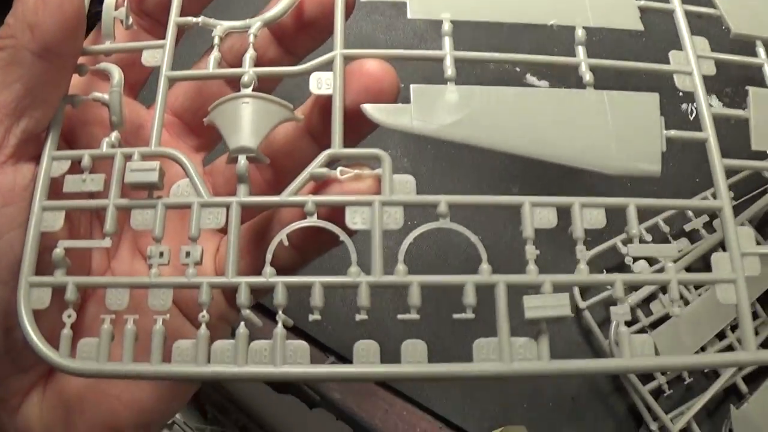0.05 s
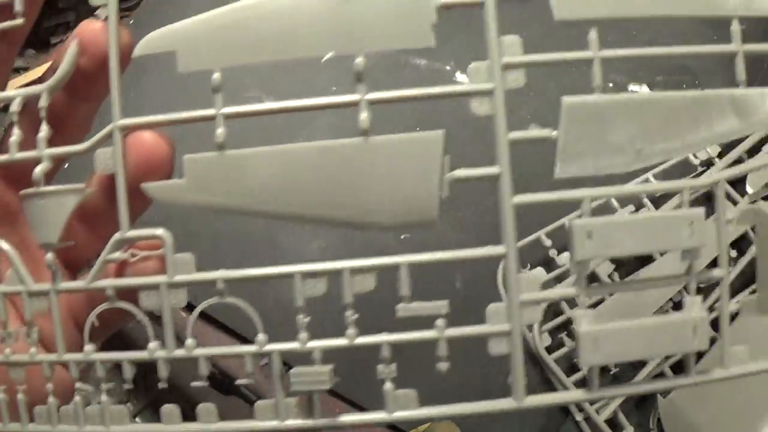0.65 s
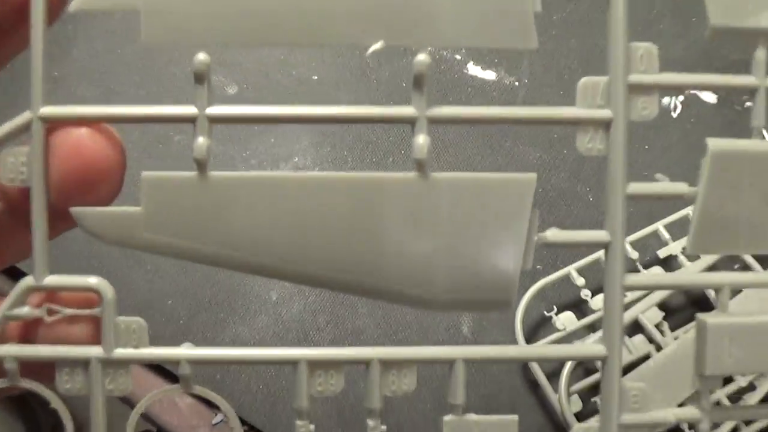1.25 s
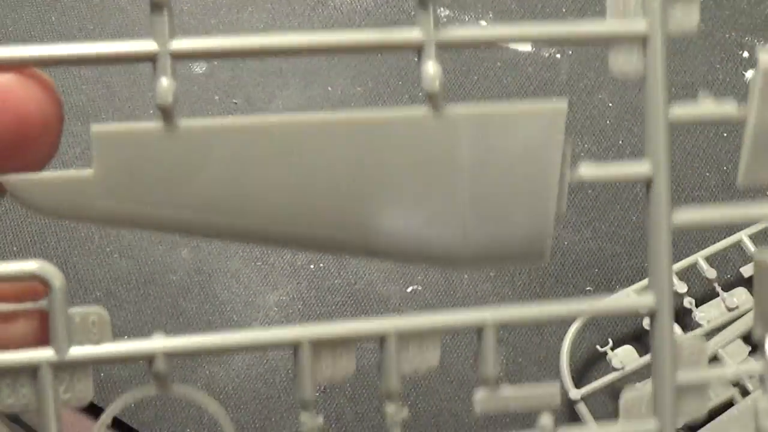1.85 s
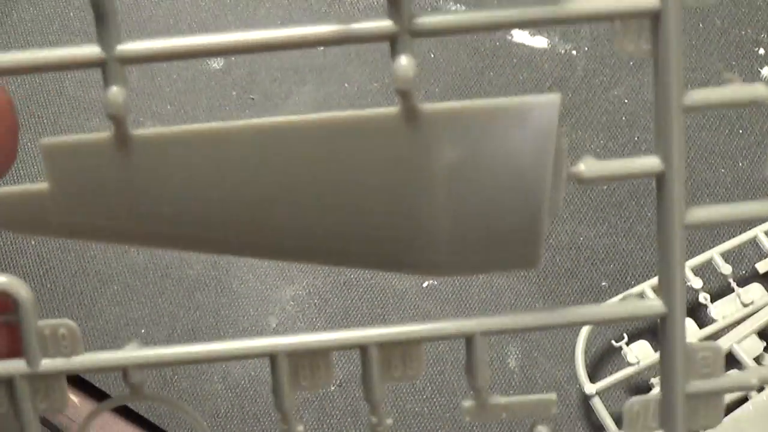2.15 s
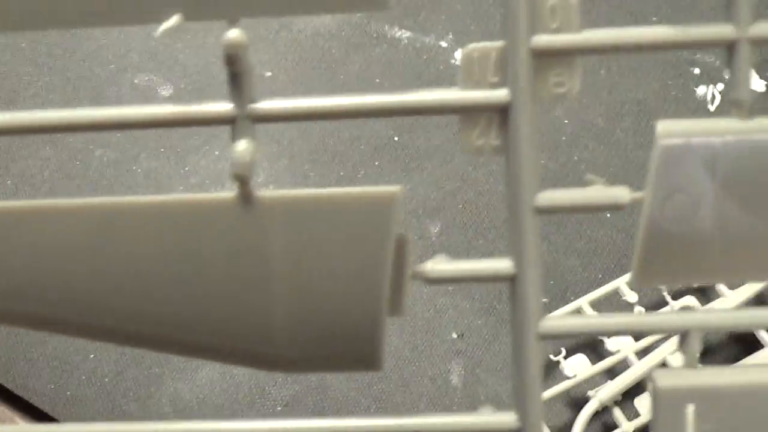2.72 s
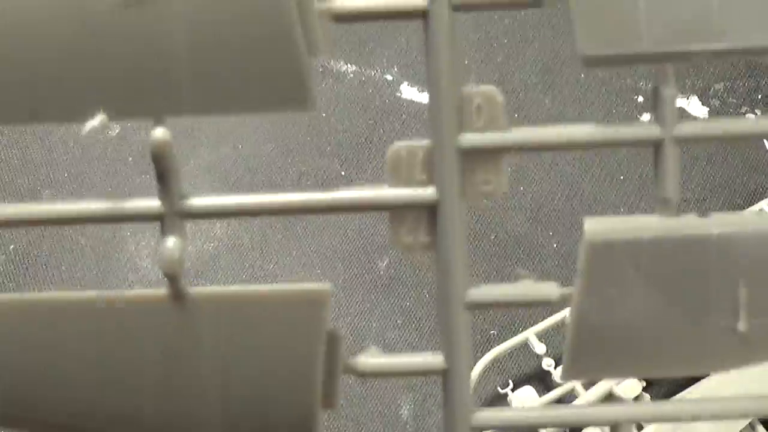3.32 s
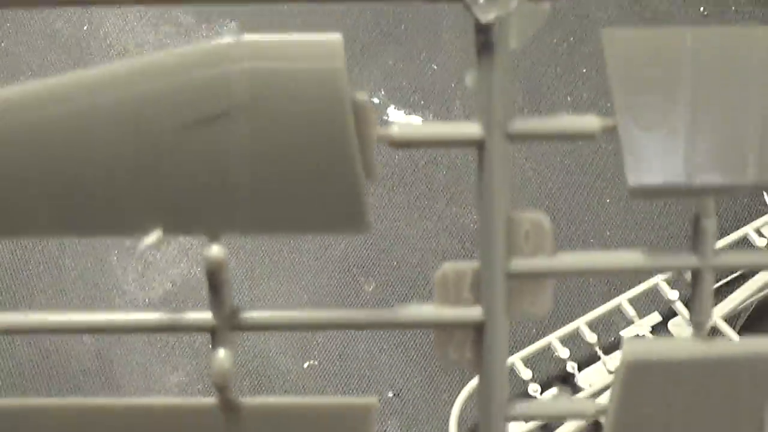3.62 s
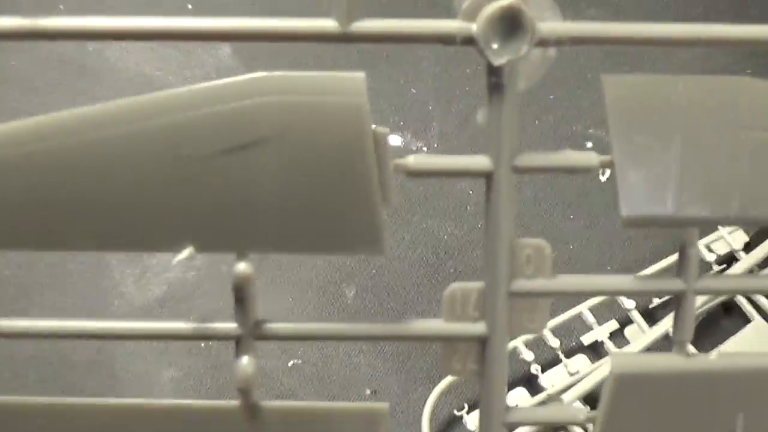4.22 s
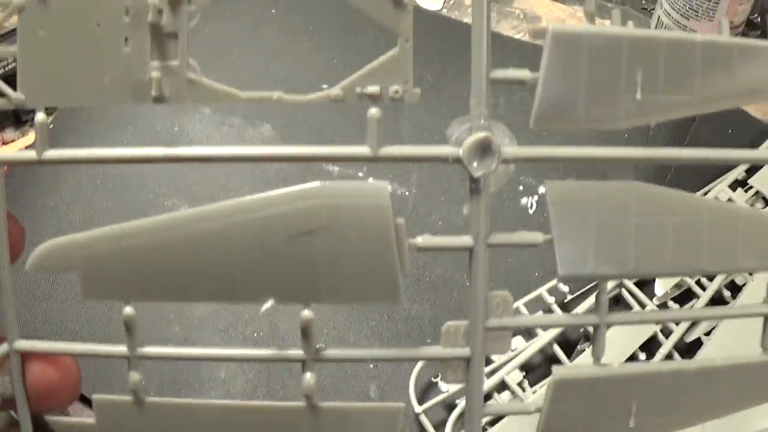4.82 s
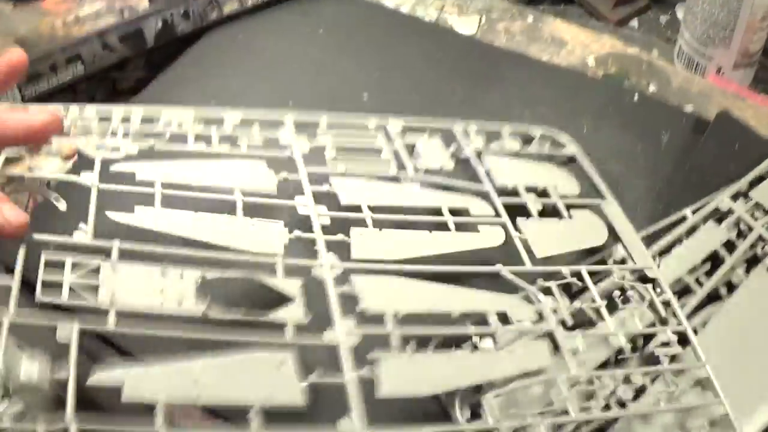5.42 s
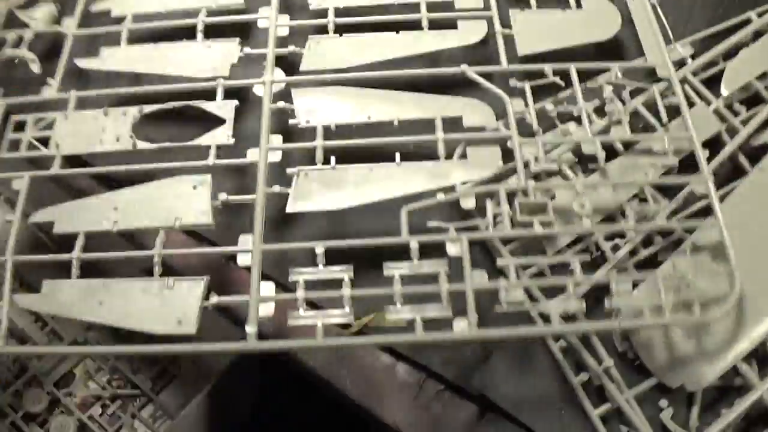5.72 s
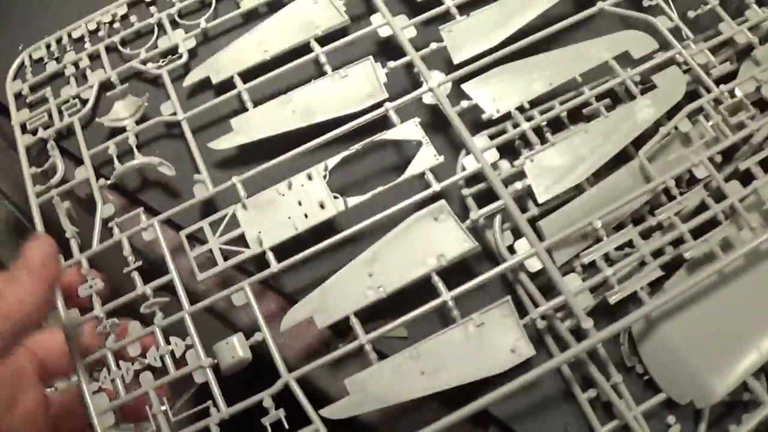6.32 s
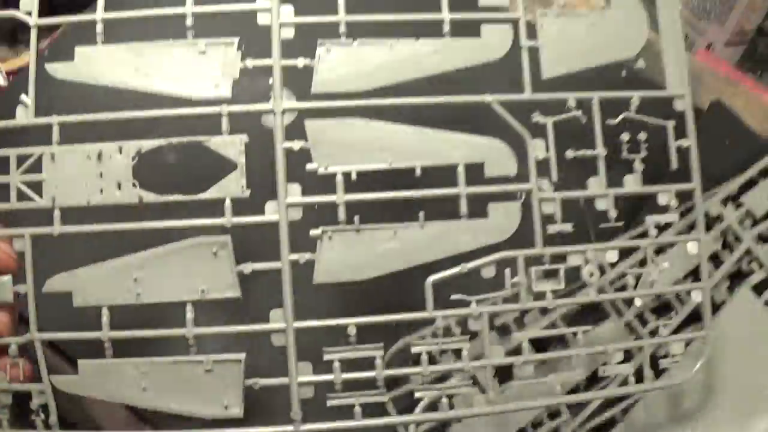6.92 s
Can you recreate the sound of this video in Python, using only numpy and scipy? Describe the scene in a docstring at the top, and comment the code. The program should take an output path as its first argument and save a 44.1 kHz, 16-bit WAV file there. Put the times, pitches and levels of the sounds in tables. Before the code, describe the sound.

A hard plastic model-kit sprue is handled close to the microphone in a quiet small room. A short cluster of dry ticks comes at about 1 second and one sharp click at 1.5 seconds. After a lull, a creaky run of small clicks comes at 4 seconds, with faint ticks just before 5. The sprue then slides off the fingers with a soft hiss. From 5.4 to 6.3 seconds it clatters onto a pile of other sprues, slightly farther away and a little to the right: quick, bright knocks, rattling small parts, brief scrapes and soft bench thuds. This is the loudest part. It settles, and lighter clicks around 6.6 and 7 seconds follow as it is picked up, over a faint rumble of arm movement. A faint, high pulsing whine like a camera's focus motor comes and goes throughout, and a faint low hum swells near 1.4 and 4.5 seconds.

```python
"""A plastic model-kit sprue ticks and creaks in one hand, slides off the fingers, clatters onto a pile of
other sprues on a bench, settles and is picked up again. Each contact is an impulse that gives a sharp
crack and excites the damped modes of the frames. Loose parts rattle, the bench thuds and sliding
friction hisses. Behind these are a rumble of moving arms, a faint pulsing whine like that of a
camera's focus motor, a low hum that comes and goes, and a quiet room."""
import sys
import numpy as np
from scipy import signal
from scipy.fft import rfft, irfft, next_fast_len
from scipy.io import wavfile
from scipy.ndimage import uniform_filter1d

SR = 44100
rng = np.random.default_rng(int(sys.argv[2]) if len(sys.argv) > 2 else 0)


def int16_out(signal):
    """Quantize to a 16-bit WAV file."""
    q = np.round(np.clip(np.atleast_2d(signal).T, -1, 1) * 32767)
    wavfile.write(sys.argv[1], SR, q.astype(np.int16))


N = 315756
TIME, RING_TIME = np.arange(N) / SR, np.arange(SR // 5) / SR
LEFT_RIGHT = np.array([[1], [-1]])

# Ticks in the hand. Each row: start in seconds, level in dB, most strongly excited frequency in Hz,
# fall to either side in dB per octave.
TICKS = [(0.278, -50, 12500, 4), (0.461, -51, 550, 2), (0.94, -30.5, 3900, 6), (0.946, -44, 910, 6),
         (0.971, -45.5, 1500, 8.5), (0.98, -35.5, 1830, 15.5), (1.5187, -18.5, 2100, 7.5),
         (1.623, -47, 2730, 9), (1.86, -54, 11000, 7), (2.065, -60.5, 2600, 3), (3.97, -52, 1700, 9),
         (3.995, -37, 5530, 6.5), (4.01, -43.5, 1520, 9), (4.039, -40, 1750, 7.5), (4.045, -40.5, 1050, 12),
         (4.091, -45.5, 1760, 8), (4.11, -38, 2220, 11.5), (4.724, -53, 2760, 5), (4.804, -55, 1100, 9),
         (4.933, -57, 6050, 3), (4.961, -44, 1600, 9), (6.968, -41.5, 400, 10.5), (7.076, -50.5, 560, 3.5)]
# Strong modes of the held frame. Each row: frequency in Hz, relative level in dB, t60 in seconds.
HELD_MODES = [(420, 26.5, 0.097), (699, 22.5, 0.083), (1108, 8, 0.048), (1320, 6.5, 0.053),
              (1950, 6.5, 0.26), (2110, 15.5, 0.07), (2820, 9, 0.02), (3980, 17, 0.023),
              (4500, 14.5, 0.044), (5540, 23, 0.0071), (9070, 17.5, 0.017)]
# How readily the held frame rings. Each entry: gain of one band in dB.
TICK_RING_DB = [2, -1, -1.1, -5, -0.6]

def held_sprue(crack_hz=2900, crack_gain_db=6.5, finger_t60=.11):
    """Damped free vibration: the flexing frame ticks, the fingers damp it, thin rods radiate no bass."""
    modes = sprue_modes(HELD_MODES, parts_t60=0.031, slope=0.5, count=240)
    start, db, pitch, fall = columns(TICKS)
    centres = np.sqrt(np.multiply(BAND_EDGES_HZ[:-1], BAND_EDGES_HZ[1:]))
    band_db = db - fall * np.abs(np.log2(centres / pitch)) + TICK_RING_DB
    crack_db = db - fall * np.abs(np.log2(crack_hz / pitch)) + crack_gain_db
    ticks = strike(start, modes, band_db, crack_db, finger_t60, pan_db=0,
                   crack_band_hz=(1500, 5110), spot_db=-5.0, spread=0.47)
    return band(ticks, 470, 21000, order=3)

# Knocks of sprue on sprue. Each row: start in seconds, level in dB, weight (bass emphasis),
# hardness (treble emphasis), damping t60 in seconds.
KNOCKS = [(5.4369, -22.5, 12.5, -6.5, 0.038), (5.4628, -21, 5, 8.5, 0.19), (5.4826, -21.5, 1, -5.5, 0.44),
          (5.5196, -22, 0, -9, 0.66), (5.5847, -23, 1, 7.5, 0.2), (5.6409, -22.5, 0, -11, .065),
          (5.653, -17.5, -4.5, 1.5, 0.2), (5.6815, -24, 3.5, 0, 0.17), (5.697, -18.5, -8, -2.5, 0.11),
          (5.7349, -32.5, -11, -7, 0.11), (5.7864, -19, 8, -4.5, .072), (5.7948, -32.5, 2, 18.5, 0.081),
          (5.811, -27, -5, -6, .14), (5.8737, -33.5, -10, 8.5, 0.26), (5.8964, -26.5, 4, 9, .26),
          (5.9085, -37, 26.5, -2, 0.16), (5.9348, -28.5, -1, 5.5, 0.14), (5.9467, -28, -5, 3, 0.26),
          (5.9659, -18.5, -5, -6, 0.035), (5.9808, -23.5, 2, -12, 0.26), (6.0089, -28.5, 11, -16, 0.14),
          (6.0361, -32.5, 3, 1, 0.36), (6.0637, -24, 1, -0.5, 0.13), (6.0825, -14, -5, -11.5, 0.042),
          (6.0939, -29, -2, 8, .13), (6.1009, -24.5, -3, -6.5, 0.43), (6.1359, -32.5, 6, 15.5, 0.11),
          (6.1579, -28, -2, -2, 0.21), (6.1767, -27, -6, -1.5, 0.071), (6.1998, -29, 0, 7, 0.14),
          (6.2225, -33.5, -1, 1, 0.45), (6.2529, -38, 3, -2, .1), (6.3029, -37, -9, 4, 0.2),
          (6.4912, -43.5, -2, 5.5, 0.32), (6.5435, -38, 0, -3, 0.064), (6.555, -37, -7, -2, 0.19),
          (6.5712, -23, -7.5, -6, 0.036), (6.596, -38, -23, -18, 0.12), (6.7212, -46, 19.5, 22.5, 0.052)]
# Strong modes of the pile. Each row: frequency in Hz, relative level in dB, t60 in seconds.
PILE_MODES = [(424, 1, 0.34), (948, 11, 0.26), (1426, 11, 0.19), (1595, 23.5, 0.047), (1703, 17.5, 0.24),
              (1907, 15.5, 0.39), (2750, 16.5, 0.13), (2770, 18.5, 0.34), (3020, 18, 0.032),
              (4560, 12, 0.15), (5180, 12, 0.13), (6360, 16, 0.046), (8300, 8, 0.11), (9500, -2, 0.044),
              (9900, 17, 0.041)]
# Ring of a plain knock. Each entry: gain of one band in dB.
KNOCK_RING_DB = [-30.5, -13, -7, -8.5, -9]

def pile(plain_t60=0.1):
    """Impact excitation: heavy knocks add bass; hard ones add treble and crack."""
    modes = sprue_modes(PILE_MODES, parts_t60=0.34, slope=0.81, count=440)
    start, db, weight, hardness, t60 = columns(KNOCKS)
    weight_db = weight * [0.98, 0.58, 0, 0.034, 0.17]   # band by band
    hardness_db = hardness * [0.14, 0.075, 0.015, 0.62, 0.85]
    band_db = db + KNOCK_RING_DB + weight_db + hardness_db
    firmness_db = 3 * np.log2(plain_t60 / t60)   # a firm contact rings less and cracks louder
    crack_db = db + 5.5 + 0.46 * hardness - 0.28 * weight + firmness_db
    pan_db = -3 + 0.18 * weight   # the pile lies to the right; heavy knocks land farther left
    return strike(start, modes, band_db, crack_db, t60, pan_db,
                  crack_band_hz=(2030, 5200), spot_db=3.5, spread=0.18)

# Radiation of the small parts. Each row: frequency in Hz, relative level in dB.
PART_SPECTRUM = [(200, -9), (800, -4.5), (1500, 3.5), (3200, 12), (5000, 5.5), (8000, 7.5), (10500, 2),
                 (12500, -3.5), (16000, -17.5)]

def sprue_modes(strong, parts_t60, slope, count):
    """Modal density: small parts add many weak modes to the strong ones, the higher dying sooner."""
    places = (np.arange(count) + rng.random(count)) / count
    hz = np.interp(places, [0, 1], np.sqrt([BAND_EDGES_HZ[0], BAND_EDGES_HZ[-1]])) ** 2
    t60 = parts_t60 * (hz / BAND_EDGES_HZ[2]) ** -slope
    weak = np.column_stack([hz, at_hz(PART_SPECTRUM, hz), t60])
    return np.vstack([strong, weak]).T

# The five bands that a contact excites. Each entry: band edge in Hz.
BAND_EDGES_HZ = [200, 800, 2000, 4500, 8500, 16000]

def strike(times, modes, band_db, crack_db, damping_t60, pan_db, crack_band_hz, spot_db, spread):
    """Modal superposition: each contact cracks and rings the modes according to the spot touched."""
    hz, mode_db, t60 = modes
    shape = (len(times), len(hz))
    # the spot along a rod favours evenly spaced groups of modes
    transit_s = rng.uniform(0.00021, 0.000866, (len(times), 1))
    place = rng.random((len(times), 1))
    favour_db = spot_db * np.sin(2 * np.pi * (hz * transit_s + place))
    radiated = rng.choice([-1, 1], shape) + spread * LEFT_RIGHT[:, None] * rng.standard_normal(shape)
    strengths = from_db(mode_db + favour_db) * radiated
    damping = fade(RING_TIME, np.maximum(damping_t60, .005))   # fingers and neighbours press on the frame
    build_up = 1 - fade(RING_TIME, 0.002)   # the blow takes a moment to spread through the rods
    ringing = 0
    for k, (low, high) in enumerate(zip(BAND_EDGES_HZ, BAND_EDGES_HZ[1:])):
        inside = (hz >= low) & (hz < high)
        ring = strengths[..., inside] @ rings(hz[inside], t60[inside]) * damping * build_up
        attack_rms = np.sqrt(np.mean(ring[..., :SR // 200] ** 2, axis=(0, 2)))
        ringing = ringing + ring * (from_db(band_db[:, k]) / attack_rms)[:, None]
    crack = band(signal.unit_impulse(len(RING_TIME)), *crack_band_hz, order=3)
    cracks = from_db(crack_db) * crack / np.abs(crack).max()
    contacts = (ringing + cracks) * from_db(LEFT_RIGHT[:, None] * pan_db / 2)
    out = np.zeros((2, N))
    for k, start in enumerate(times.ravel()):
        add(out, start, contacts[:, k])
    return out

# Spectrum of the loose parts. Each row: frequency in Hz, relative level in dB.
RATTLE_SPECTRUM = [(35, -61), (60, -16), (233, -3), (593, -14.5), (842, 0.5), (1060, -8.5), (1700, -0.5),
                   (1950, -6.5), (2770, 0), (4750, -8.5), (10300, -15.5), (11800, -23), (13900, -23),
                   (16000, -34)]

def rattle(per_s, size_db, part_t60, pan_db, spread, count=10):
    """Shot noise: loose parts make tiny random contacts, each part with a brief ring of its own."""
    sizes = from_db(size_db * np.minimum(rng.exponential(1, N), 3)) * rng.choice([-1, 1], N)
    clicks = sizes * (rng.random(N) < per_s / SR)
    part = rng.integers(0, count, N)
    mid, side = rng.standard_normal((2, count, len(RING_TIME))) * fade(RING_TIME, part_t60)
    swarm, level = np.zeros((2, N)), shaking()
    for i in np.flatnonzero(clicks * level):
        add(swarm, i / SR, clicks[i] * (mid[part[i]] + spread * LEFT_RIGHT * side[part[i]]))
    swarm = colour(swarm, RATTLE_SPECTRUM)
    power = uniform_filter1d(np.mean(swarm ** 2, axis=0), size=SR // 25)
    steady = swarm / np.sqrt(np.maximum(power, 1e-6))
    return steady * level * from_db(LEFT_RIGHT * pan_db / 2)

def shaking(rise_s=0.009):
    """Energy summation: each knock shakes the loose parts, which chatter briefly and settle slowly."""
    t = np.arange(SR) / SR
    chatter = from_db(-15.5) * fade(t, t60=0.17)
    settling = from_db(-30) * fade(t, t60=1.79)
    response = (chatter + settling) * (1 - np.exp(-t / rise_s))
    energy = np.zeros((1, N))
    for start, db, *_ in KNOCKS:
        add(energy, start, (from_db(db) * response) ** 2)
    return np.sqrt(energy[0])

# The bench takes the weight. Each row: start in seconds, level in dB.
THUDS = [(5.463, -44), (5.654, -68), (5.786, -33.5), (5.901, -45.5), (6.135, -41), (6.97, -48)]
# Modes of the bench top. Each row: frequency in Hz, relative level in dB, t60 in seconds.
BENCH_MODES = [(75, -11, 0.17), (124, -9.5, 0.25), (176, -7, 0.12), (244, -9, 0.14)]

def bench():
    """Plate resonance: the low modes of the bench top thud softly under the pile."""
    hz, db, t60 = np.transpose(BENCH_MODES)
    out, modes = np.zeros((2, N)), rings(hz, t60)
    for start, thud_db in THUDS:
        add(out, start, from_db(thud_db + db) * rng.choice([-1, 1], len(hz)) @ modes)
    return out

# Strokes over skin and plastic. Each row: time of full level in seconds, hold in seconds, level in dB.
STROKES = [(0.365, .12, -64.5), (5.015, 0.072, -53.5), (5.179, 0.06, -53.5), (5.286, 0.045, -61.5),
           (5.403, 0.3, -51), (5.831, 0.013, -39), (6.124, 0.042, -39), (6.508, .015, -49),
           (6.715, 0.053, -54), (6.885, 0.26, -67)]
# Resonances of the sliding rods. Each row: frequency in Hz, bandwidth in Hz, relative gain in dB.
SQUEAL = [(5040, 78, 1.5), (7700, 190, -16)]
# Colour of the friction. Each row: frequency in Hz, relative gain in dB.
SLIDE_SPECTRUM = [(41, -35), (70, -25), (129, 2), (170, -25), (244, -0.5), (1000, -4), (2600, -5),
                  (2840, -3.5), (4090, -7.5), (8860, -2), (11100, -4.5), (16000, -25)]

def slide(grain_db, spread, attack_s=0.033, release_t60=0.26):
    """Sliding friction: a hiss roughened by tiny catches sets the rods squealing faintly."""
    catches = band(rng.standard_normal(N), 9.9, 170, order=1)
    mid, side = rng.standard_normal((2, N)) * from_db(grain_db * catches / rms(catches))
    rub = mid + spread * LEFT_RIGHT * side
    squeal = sum(from_db(db) * band(rub, hz - width / 2, hz + width / 2, order=1)
                 for hz, width, db in SQUEAL)
    level = np.zeros(N)
    for full_s, hold_s, db in STROKES:
        swell = np.exp(np.minimum(TIME - full_s, 0) / attack_s)
        release = fade(np.maximum(TIME - full_s - hold_s, 0), release_t60)
        level += from_db(db) * swell * release
    return level * colour(rub + squeal, SLIDE_SPECTRUM)

# Hands and arms move over the bench. Each row: time in seconds, level in dB.
ARM_MOVEMENT = [(4.7, -79), (5.3, -70.5), (6.2, -57.5), (6.6, -66.5), (7.16, -67)]

def handling():
    """Band-limited noise: a dull rumble follows the movement of the arms."""
    rumble = band(rng.standard_normal(N), 40, 326)
    times, db = np.transpose(ARM_MOVEMENT)
    level = from_db(np.interp(TIME, times, db, left=-200, right=-200))
    return level * rumble / rms(rumble)

# Motor runs. Each row: start and end in seconds, pitch in Hz, first and last level in dB.
FOCUS_RUNS = [(0, .25, 2770, -65.5, -69), (.3, .56, 3280, -70, -71), (.6, .93, 3170, -68, -64.5),
              (1.63, 2.3, 3190, -63.5, -65), (2.33, 4, 3180, -65.5, -67.5),
              (4.73, 7.16, 2850, -63.5, -65.5)]

def focus_motor(burst_s, jitter, housing_hz, housing_db, rasp, steps_per_s=30, centre_s=.018):
    """Pulsed excitation: the motor moves in regular bursts, raspy pips that also stir its housing."""
    out = np.zeros((2, N))
    t = np.arange(SR // steps_per_s) / SR - centre_s
    swell = np.sqrt(2) * np.exp(-.5 * (t / burst_s) ** 2)
    for start, end, hz, first_db, last_db in FOCUS_RUNS:
        steps = np.arange(round(start * steps_per_s), round(end * steps_per_s))
        for step, db in zip(steps, np.linspace(first_db, last_db, len(steps))):
            pip_hz, ring_hz = np.array([hz, housing_hz]) * (1 + jitter * rng.standard_normal(2))
            pip = np.sin(2 * np.pi * (pip_hz * t + rng.random()))
            housing = from_db(housing_db) * np.sin(2 * np.pi * ring_hz * t)
            add(out, step / steps_per_s, from_db(db + rng.normal(0, 1)) * swell * (pip + housing))
    shake = band(rng.standard_normal(N), 100, 700, order=1)
    return out * (1 + rasp * shake / rms(shake))

# Swells of the hum. Each row: time of the peak in seconds, width in seconds, level in dB.
HUM_SWELLS = [(1.42, 0.084, -64), (4.5, 0.1, -67.5)]

def hum(hz=201):
    """Amplitude modulation: a soft low tone swells out of the background and sinks back."""
    swell = sum(from_db(db) * np.exp(-.5 * ((TIME - s) / width) ** 2) for s, width, db in HUM_SWELLS)
    return swell * np.sin(2 * np.pi * hz * TIME)

# Room noise and hiss. Each row: frequency in Hz, relative level in dB.
AIR_SPECTRUM = [(15, -31), (25, -14.5), (108, -0.5), (145, -7.5), (206, -3), (416, -6), (545, -7),
                (1190, -11.5), (2110, -13), (2690, -14.5), (3160, -16), (3430, -16.5), (3920, -18.5),
                (14800, -25.5), (16000, -21.5)]
# Likeness of the two sides. Each row: frequency in Hz, correlation from 0 to 1.
AIR_CORRELATION = [(60, 0.73), (180, 0.64), (550, 0.068), (1650, 0.056), (4970, 0.54), (15000, 1)]

def air(level_db=-61):
    """Partial coherence: room noise and microphone hiss are alike at both sides in bass and top."""
    alike = np.clip(at_hz(AIR_CORRELATION, np.fft.rfftfreq(N, 1 / SR)), 0, 1)
    mid, side = rfft(rng.standard_normal((2, N)))
    noise = irfft(np.sqrt(1 + alike) * mid + np.sqrt(1 - alike) * side * LEFT_RIGHT, N)
    return from_db(level_db) * colour(noise, AIR_SPECTRUM)

def room(x, t60, dull_hz):
    """Diffuse reverberation: a small workroom returns duller reflections, different at each side."""
    t = np.arange(SR // 2) / SR
    tail = band(rng.standard_normal((2, len(t))), 250, dull_hz, order=1) * fade(t, t60) * (t > .005)
    return signal.fftconvolve(x, tail / np.sqrt(np.sum(tail ** 2) / 2), axes=1)[:, :N]

def microphones(x, side_low_hz, presence):
    """Close spacing: two capsules hear the same bass; the right one has more upper midrange."""
    mid, side = (x[0] + x[1]) / 2, (x[0] - x[1]) / 2
    side = band(side, side_low_hz, 12400, order=1) - presence * band(mid, 2600, 2800, order=1)
    return mid + LEFT_RIGHT * side

def rings(hz, t60):
    """Damped oscillation: one decaying sine per mode."""
    return np.sin(2 * np.pi * hz[:, None] * RING_TIME) * fade(RING_TIME, t60[:, None])

def fade(t, t60):
    """Exponential decay, by 60 dB in t60 seconds."""
    return from_db(-60 * t / t60)

def band(x, low_hz, high_hz, order=2):
    """Causal band-pass filtering."""
    sections = signal.butter(order, [low_hz, min(high_hz, .45 * SR)], "band", fs=SR, output="sos")
    return signal.sosfilt(sections, x + 1e-18)

def colour(x, spectrum):
    """Minimum-phase filtering by the given spectrum, scaled to rms 1."""
    size = 2 * next_fast_len(N // 2 + SR // 4)
    gain = from_db(at_hz(spectrum, np.fft.rfftfreq(size, 1 / SR)))
    cepstrum = irfft(np.log(gain))
    cepstrum[1:size // 2] *= 2   # folding onto positive time makes the filter causal
    cepstrum[size // 2 + 1:] = 0
    out = irfft(rfft(x, size) * np.exp(rfft(cepstrum)))[..., :N]
    return out / rms(out)

def at_hz(points, hz):
    """Interpolation of a spectrum on a log-frequency axis."""
    point_hz, value = np.transpose(points)
    return np.interp(np.log(np.maximum(hz, 1)), np.log(point_hz), value)

def from_db(db):
    """Decibels to amplitude ratio."""
    return 10 ** (np.asarray(db) / 20)

def rms(x):
    """Root mean square over all samples."""
    return np.sqrt(np.mean(x ** 2) + 1e-20)

def columns(rows):
    """The columns of an event table, each of shape (events, 1)."""
    return np.transpose(rows)[..., None]

def add(out, start_s, sound):
    """Superposition of a short sound onto the mix."""
    start = max(round(start_s * SR), 0)
    out[:, start:start + sound.shape[-1]] += sound[..., :max(N - start, 0)]

def scene():
    """Direct-to-reverberant ratio: the held sprue is near and dry; the farther pile has more room."""
    near = held_sprue() + slide(grain_db=2.0, spread=0.28)
    far = pile() + bench()
    far += from_db(-2.0) * rattle(per_s=220, size_db=2.5, part_t60=0.045, pan_db=-1.5, spread=0.055)
    near_room = room(from_db(-22) * near, t60=0.15, dull_hz=710)
    far_room = room(from_db(-17.0) * far, t60=0.18, dull_hz=5100)
    motor = focus_motor(burst_s=0.0031, jitter=.005, housing_hz=2160, housing_db=-11.5, rasp=0.44)
    return near + far + near_room + far_room + motor + hum() + handling() + air()

def record(dry):
    """Band limiting: a small stereo pair picks up the sound, cut steeply above 16 kHz."""
    heard = microphones(dry, side_low_hz=270, presence=0.027)
    return signal.sosfilt(signal.ellip(10, .2, 80, 16000, fs=SR, output="sos"), heard)

dry = scene()
out = record(dry)
int16_out(out)
```